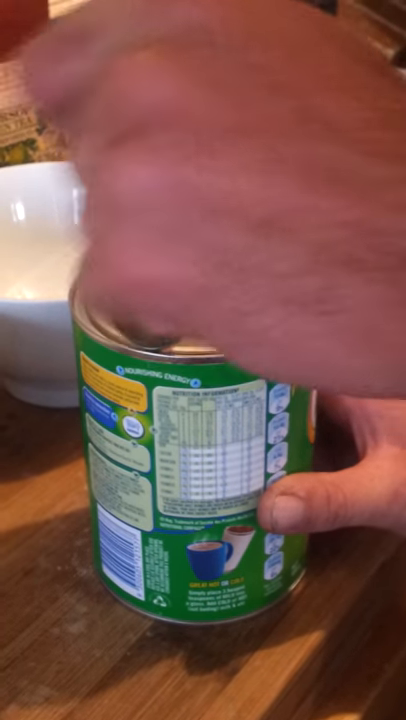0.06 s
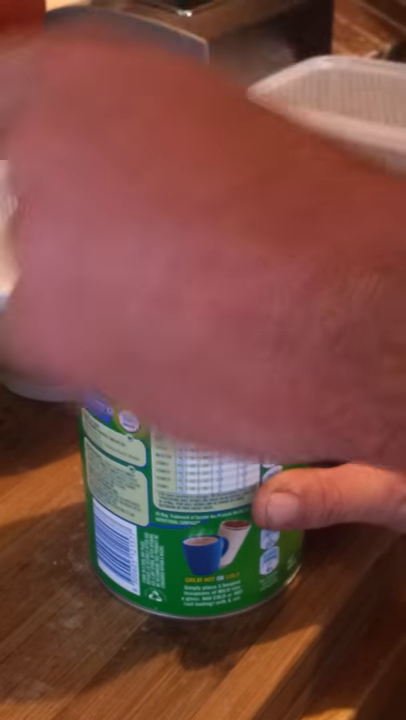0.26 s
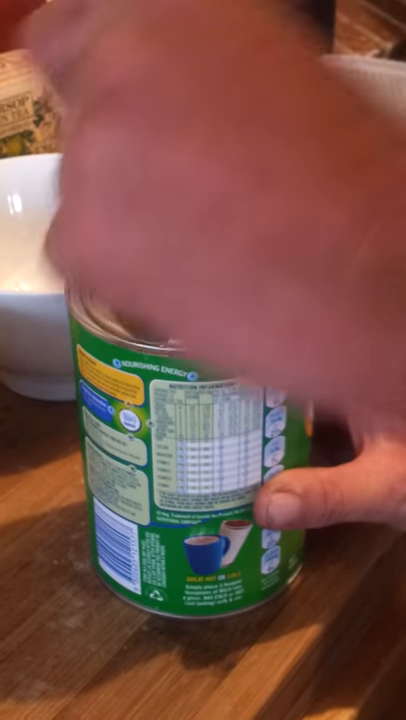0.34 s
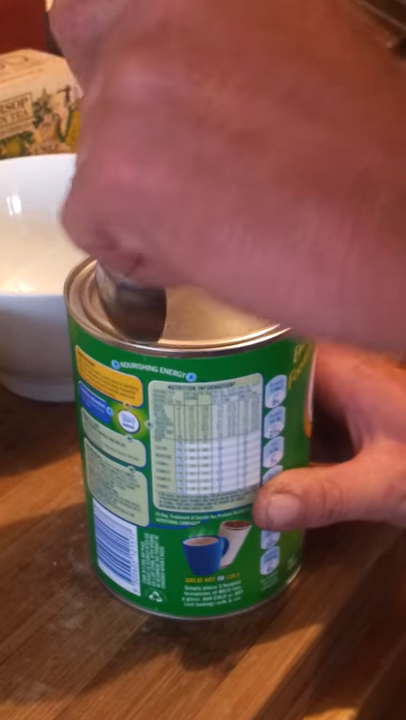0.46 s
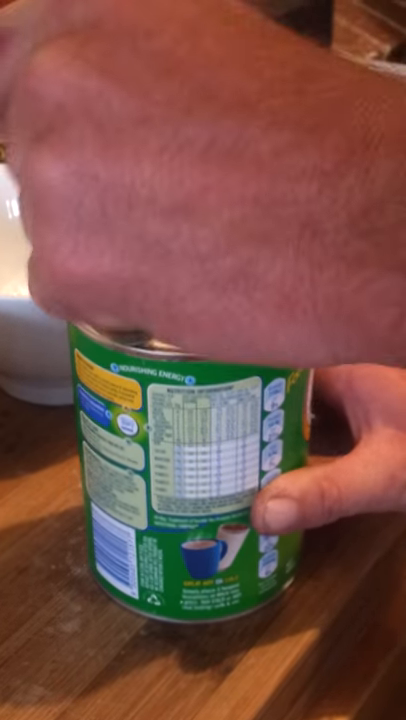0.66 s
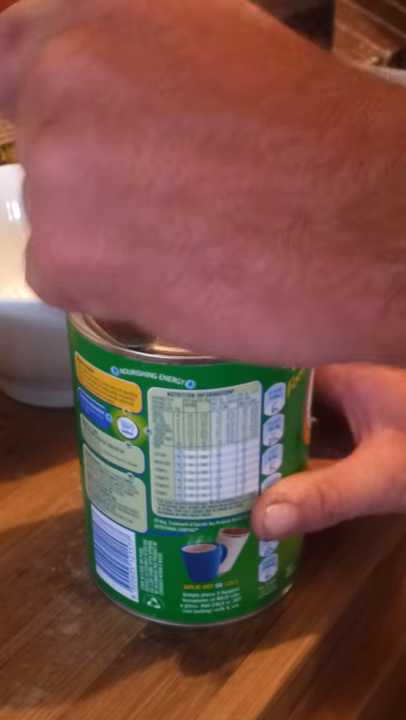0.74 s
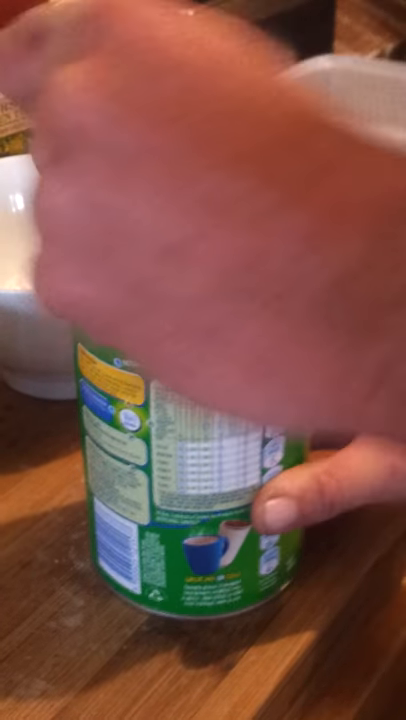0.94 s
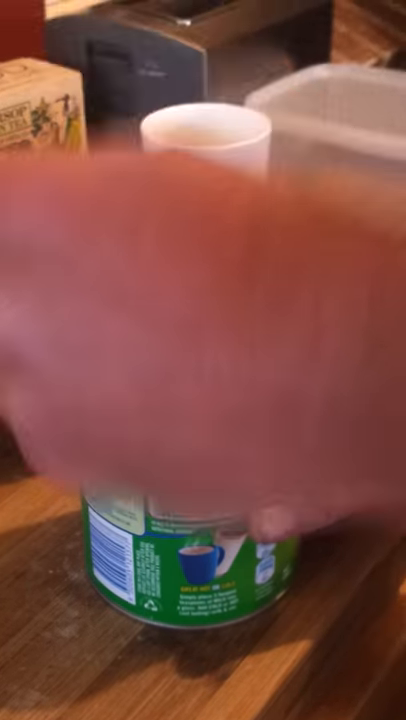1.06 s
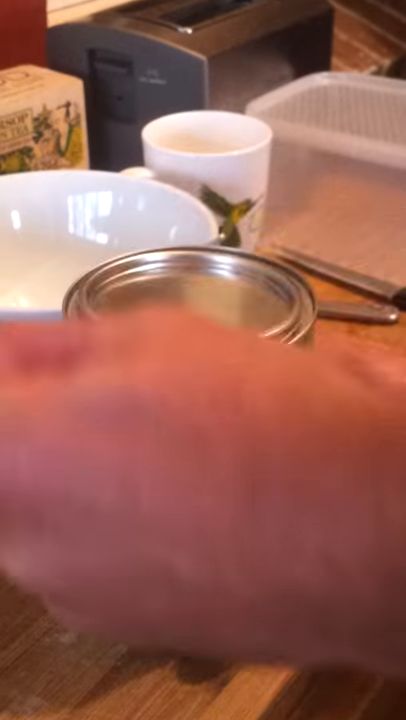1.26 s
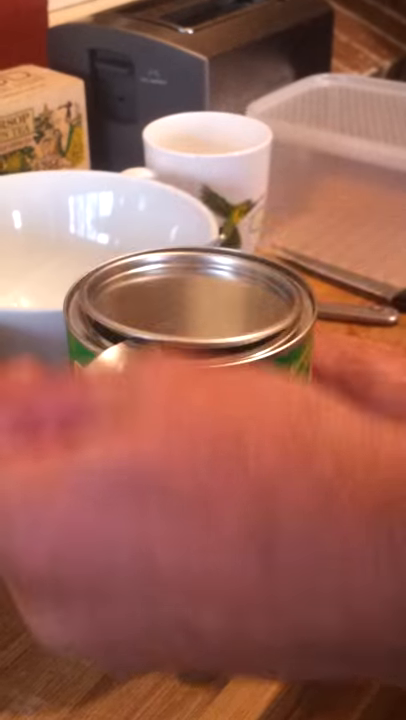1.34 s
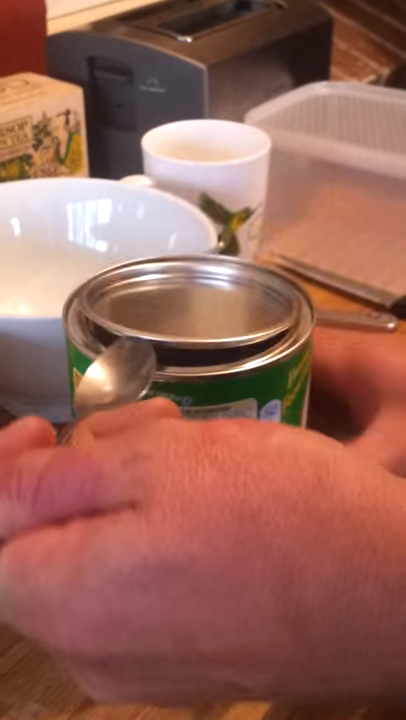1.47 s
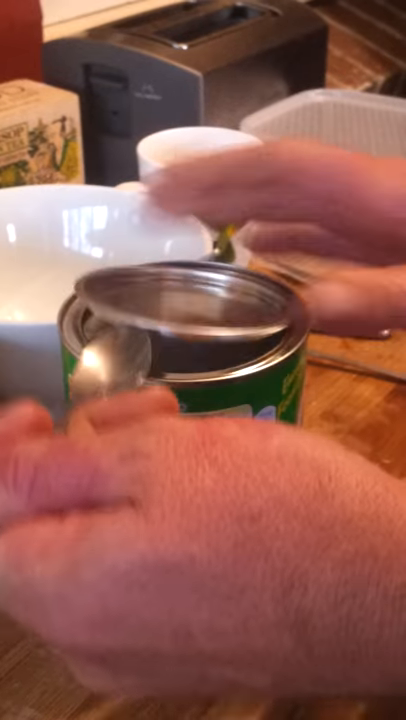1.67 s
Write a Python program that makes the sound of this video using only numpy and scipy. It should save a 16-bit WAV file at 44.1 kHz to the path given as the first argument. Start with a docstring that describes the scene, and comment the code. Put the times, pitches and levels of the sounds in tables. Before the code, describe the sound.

Metal knocks as a spoon levers a tin's lid, which pops free and briefly clatters.

```python
"""You hear knocks on metal, one bright clash, then a ringing pop and a short clatter.
A spoon is levering the tight lid off a tin, close by on a wooden kitchen counter. The knocks are
short because the seated lid stops the tin from ringing. The spoon slips once with a clash and bites
again; the lid pops free, rings and chatters down on the rim. A small kitchen echoes each blow."""
import sys
import numpy as np
from scipy import signal
from scipy.fft import rfft, irfft
from scipy.io import wavfile
from scipy.ndimage import uniform_filter1d

SR = 44100
rng = np.random.default_rng(int(sys.argv[2]) if len(sys.argv) > 2 else 0)


def transcribe(u):
    """Save the signal u as a 16-bit wav file named by the first command-line argument.

    u: samples, shape (n,) or (channels, n), limited to [-1, 1]; the rate is SR.
    q: integer samples, one column per channel.
    """
    v = np.clip(np.atleast_2d(u).T, -1, 1)
    q = np.round(v * 32767).astype(np.int16)
    wavfile.write(sys.argv[1], SR, q)


N = 74970  # 1.7 seconds

# A colour says how strong a noise is from low to high. Each row: frequency in Hz, relative level in dB.
ROOM_NOISE_COLOUR = [(15, -47), (25, -9.5), (96, 5.5), (301, -6.5), (485, -5.5), (1230, -14), (2030, -9.5),
                     (2570, -33), (2780, -23.5), (4030, -13), (5840, -19), (11300, -17.5), (14000, -74)]
HAND_RUB_COLOUR = [(80, 4.5), (250, 2), (700, 2.5), (1700, -3.5), (4000, -10.5), (7000, -8.5),
                   (11500, -24.5)]
COUNTER_COLOUR = [(25, -0.5), (60, -7), (125, -4.5), (200, -25), (450, -7), (900, -46), (4000, -84)]
RIM_SCRAPE_COLOUR = [(1500, -28), (5000, -17), (6300, -12), (7000, 5), (8200, -8.5), (11500, -30)]
RIM_KNOCK_COLOUR = [(40, -33), (130, -31), (200, -24), (265, -13), (420, -18.5), (600, -15), (790, -7.5),
                    (1100, -7.5), (1450, -2), (1730, -13), (2000, -4.5), (2350, -12.5), (2750, -11.5),
                    (3250, -10.5), (4100, -22), (5200, -17), (7000, -13.5), (8800, -26.5), (11500, -28.5),
                    (14000, -70)]
CLASH_COLOUR = [(59, -66.5), (100, -18), (145, -29), (202, -79), (325, -15.5), (759, -12.5), (807, -7),
                (1060, -19.5), (1380, -5), (1730, -19), (2000, -3.5), (2410, -15), (3160, -1.5),
                (3650, -9.5), (4400, -6), (4980, -9.5), (6380, 3), (7690, -4), (9450, -14), (10900, -12),
                (11600, -17.5), (12400, -57.5), (14000, -63)]
CLACK_COLOUR = [(150, -31), (450, -38), (720, -13.5), (1000, -16.5), (1300, -0.5), (1580, -4.5),
                (1850, -10), (2300, -21), (3250, -15), (3900, -11.5), (4500, -26.5), (6100, -14.5),
                (6700, -42), (7300, -10.5), (8230, -27.5), (11100, -21.5), (14000, -84)]
CLANG_COLOUR = [(100, -37), (300, -20), (480, -16.5), (620, -24), (800, -31), (1000, -25), (1280, -10),
                (1750, -2.5), (2050, -9.5), (2470, -36), (2850, -9), (3250, 4), (3900, -16), (4750, -8),
                (6000, -16.5), (7200, -11.5), (8700, -24.5), (10700, -21), (11900, -37), (14000, -91)]

# Hands and spoon rub on the tin. Each row: time in seconds, level in dB.
RUB_LEVELS = [(0, -49), (0.13, -50.5), (0.5, -55), (0.88, -61.5), (1.0, -48.5), (1.15, -49.5), (1.4, -56.5),
              (1.7, -60)]
# Thumps in the counter. Each row: start in seconds, level in dB, fade time in seconds.
# A fade time is how long a sound takes to drop by 60 dB.
COUNTER_THUMPS = [(0.1573, -29.5, 0.049), (0.2661, -43.5, 0.34), (1.2282, -21.5, 0.054)]
# The spoon scrapes the rim. Each row: start in seconds, length in seconds, level in dB.
RIM_SCRAPES = [(1.045, 0.012, -42), (1.1975, 0.0067, -15.5), (1.227, 0.017, -20)]
# The lid bends. Each row: start in seconds, pitch in Hz, level in dB, fade time in seconds.
LID_FLEXES = [(0.1572, 789, -11.5, 0.11), (0.1575, 1460, -7.5, 0.033), (0.1576, 2723, -19, .025),
              (1.04, 730, -30, 0.039), (1.144, 704, -27.5, 0.065), (1.1445, 1714, -19.5, 0.031)]
# Knocks on the rim. Each row: start in seconds, bass, middle and treble gain in dB, fade time in seconds.
RIM_KNOCKS = [(0.087, -37, -42, -35, 0.019), (0.1567, -7.5, -6.5, -4.5, 0.044),
              (0.579, -33, -66, -59, 0.034), (0.659, -36.5, -46.5, -47.5, 0.063),
              (0.785, -28, -38.5, -33, 0.023), (0.917, -27.5, -22.5, -25.5, 0.028),
              (1.009, -47, -32.5, -29.5, 0.021), (1.0414, -21, -34.5, -28.5, 0.047),
              (1.144, -28, -29, -36.5, 0.078), (1.189, -20.5, -39, -32, 0.077),
              (1.197, -15.5, -21.5, -23, 0.041), (1.221, -18.5, -44, -11.5, .05),
              (1.2303, -11.5, -5.5, 0.5, .035), (1.414, -27, -29.5, -25, 0.038)]
# The loose lid hits the rim. Each row: start in seconds, relative level in dB.
LID_BOUNCES = [(1.414, 1), (1.4212, -7.5), (1.4283, -6), (1.442, -11.5), (1.476, -16.5), (1.517, -22.5)]
# The ringing tones of the spoon and rim, the loose lid as it lands, and the lid as it springs free. Each row:
# pitch in Hz, relative level in dB, fade time in seconds.
SPOON_AND_RIM_TONES = [(810, -7, 0.34), (1440, -5, 0.38), (1996, -13, .33), (3324, -0.5, 0.34),
                       (3950, 2, 0.21), (4460, -2, 0.23), (5990, 2, 0.33), (6030, -3, .27), (6200, 11, 0.2),
                       (6590, 0, .22), (7400, -11, 0.3), (7710, 11, 0.25), (8080, -6, .22), (9959, -3, .26)]
LOOSE_LID_TONES = [(1297, 0, 0.32), (1494, -9, 0.24), (1523, 0.5, 0.27), (2186, -13, 0.3),
                   (2890, -19, 0.45), (3170, -10, .32), (3930, -11, 0.21), (5233, -18, 0.37),
                   (5373, -25, .23), (6180, -10.5, 0.34), (7200, -11, 0.24), (9205, -10, .15),
                   (10940, -16, 0.1)]
FREED_LID_TONES = [(1236, 11, 0.19), (1361, 6, 0.343), (1510, -3, .35), (1766, 4, 0.22), (1940, 1, .3),
                   (2440, -9, .42), (2946, 1, 0.49), (3225, 4.5, 0.49), (3196, 9, 0.23), (3660, -12, 0.39),
                   (4650, 4, 0.3), (5430, -1, 0.16), (5680, 3, .3), (7250, 3, .19)]

BASS_EDGE_HZ = 1045  # where the bass ends and the middle begins


def gain(db):
    """Turn decibels into a number to multiply a sound by."""
    return 10 ** (np.asarray(db) / 20)


def since(start):
    """Seconds since a moment, zero before it."""
    return np.maximum(np.arange(N) / SR - start, 0)


def noise(colour):
    """Steady noise with the given colour, always at the same overall level."""
    hz, db = np.array(colour).T
    freqs = np.maximum(np.fft.rfftfreq(N, 1 / SR), 1)
    strengths = gain(np.interp(np.log(freqs), np.log(hz), db))
    phases = np.exp(2j * np.pi * rng.random(len(freqs)))
    sound = irfft(strengths * phases, N)
    return sound / sound.std()


def split(sound, hz):
    """The parts of a sound below and above a frequency."""
    low = irfft(rfft(sound) / (1 + (np.fft.rfftfreq(N, 1 / SR) / hz) ** 6), N)
    return low, sound - low


def strike(start, fade_s, rise_s):
    """The loudness of a hit over time: it rises quickly, then dies away."""
    t = since(start)
    return np.minimum(t / rise_s, 1) * gain(-60 * t / fade_s)


def ring(start, tones):
    """Struck metal rings with pure tones that start together and fade at their own speeds."""
    t = since(start)
    return sum(rng.choice([-1, 1]) * gain(db - 60 * t / fade_s) * np.sin(2 * np.pi * hz * t)
               for hz, db, fade_s in tones)


def background():
    """Quiet room noise and the soft, uneven rubbing of hands and spoon on the tin."""
    times, db = np.array(RUB_LEVELS).T
    flicker = uniform_filter1d(rng.standard_normal(N), size=600)
    rub_db = np.interp(since(0), times, db) + 1.4 * flicker / flicker.std()
    return gain(-58) * noise(ROOM_NOISE_COLOUR) + gain(rub_db) * noise(HAND_RUB_COLOUR)


def kitchen_echo(sound, delay_s=0.0043):
    """Sound bounces around a small, hard room; the middle pitches linger longest."""
    low, treble = split(rng.standard_normal(N), hz=5940)
    bass, middle = split(low, BASS_EDGE_HZ)
    bands = [(gain(-2) * bass, 0.33), (middle, 0.44), (treble, 0.24)]
    echo = sum(band * strike(delay_s, fade_s, rise_s=0.0036) for band, fade_s in bands)
    return signal.fftconvolve(sound, echo / np.sqrt(np.sum(echo ** 2)))[:N]


def counter_thumps():
    """The hardest blows pass through the tin into the wooden counter."""
    wood = noise(COUNTER_COLOUR)
    return sum(gain(db) * wood * strike(start, fade_s, rise_s=0.002)
               for start, db, fade_s in COUNTER_THUMPS)


def spoon_scrapes():
    """The spoon's edge slides on the rim; each bright scrape swells and stops."""
    grit = noise(RIM_SCRAPE_COLOUR)
    scrapes = np.zeros(N)
    for start, length, db in RIM_SCRAPES:
        progress = np.minimum(since(start) / length, 1)
        scrapes += gain(db) * grit * np.sqrt(np.abs(np.sin(np.pi * progress)))
    return scrapes


def lid_flexes():
    """The seated lid buckles under the spoon with short, hollow notes."""
    return sum(ring(start, [(hz, db, fade_s)]) for start, hz, db, fade_s in LID_FLEXES)


def rim_knocks():
    """Spoon and lid knock on the rim; the hardness of each hit sets its bass, middle and treble."""
    bass, rest = split(noise(RIM_KNOCK_COLOUR), BASS_EDGE_HZ)
    middle, treble = split(rest, hz=4010)
    knocks = np.zeros(N)
    for start, bass_db, middle_db, treble_db, fade_s in RIM_KNOCKS:
        blend = gain(bass_db) * bass + gain(middle_db) * middle + gain(treble_db) * treble
        knocks += blend * strike(start, fade_s, rise_s=0.00053)
    return knocks


def spoon_slip(start=0.2661):
    """The spoon slips with a bright clash that sets it and the rim ringing."""
    clash = gain(-8) * noise(CLASH_COLOUR) * strike(start, fade_s=0.31, rise_s=0.00013)
    return clash + gain(-25) * ring(start, SPOON_AND_RIM_TONES)


def lid_chatter():
    """The loose lid clacks at every bounce and rings from its first landing."""
    metal = noise(CLACK_COLOUR)
    clacks = sum(gain(db) * metal * strike(start, fade_s=0.045, rise_s=0.00033)
                 for start, db in LID_BOUNCES)
    first_landing = LID_BOUNCES[0][0]
    return gain(-21) * clacks, gain(-25.5) * ring(first_landing, LOOSE_LID_TONES)


def lid_pop(start=1.2305):
    """The lid springs free with a clang and rings on its own."""
    clang = gain(-11) * noise(CLANG_COLOUR) * strike(start, fade_s=0.33, rise_s=0.0009)
    return clang + gain(-29.5) * ring(start, FREED_LID_TONES)


def scene():
    """Add everything into one channel; the short blows feed the echo most, the long rings least."""
    clacks, lid_ring = lid_chatter()
    blows = rim_knocks() + counter_thumps() + clacks
    rings = spoon_slip() + lid_pop() + lid_ring
    prying = lid_flexes() + spoon_scrapes()
    echo = kitchen_echo(gain(-4.5) * blows + gain(-14) * rings + gain(-7.5) * prying)
    return (blows + rings + prying + echo + background())[None]


def record(dry, peak_limit=0.76):
    """Drop the highest treble, round off the loudest peaks, then soften the harshness this adds."""
    dull = signal.sosfilt(signal.ellip(8, 0.3, 60, 11800, fs=SR, output="sos"), dry)
    rounded = dull / (1 + (dull / peak_limit) ** 6) ** (1 / 6)
    soft = signal.sosfilt(signal.butter(4, 13000, fs=SR, output="sos"), rounded)
    return signal.sosfilt(signal.ellip(8, 0.2, 70, 15800, fs=SR, output="sos"), soft)


dry = scene()
out = record(dry)
transcribe(out)
```